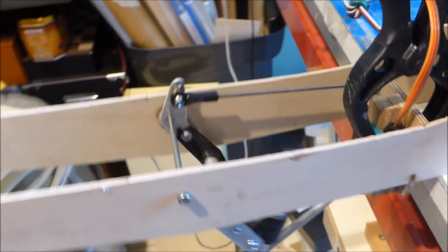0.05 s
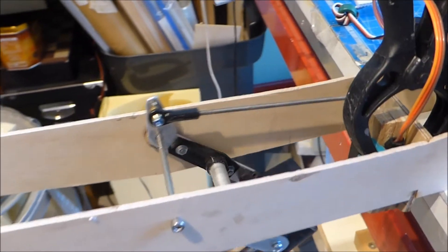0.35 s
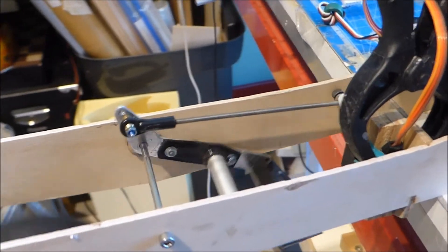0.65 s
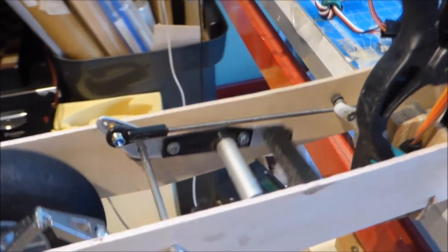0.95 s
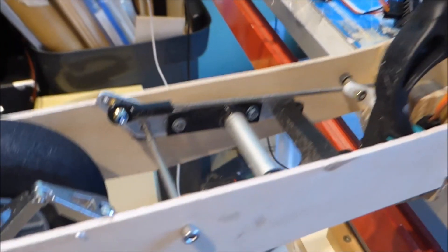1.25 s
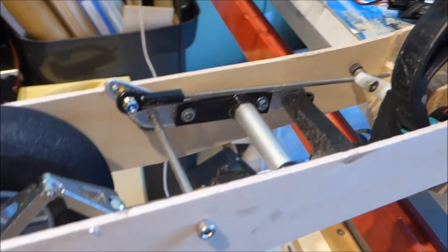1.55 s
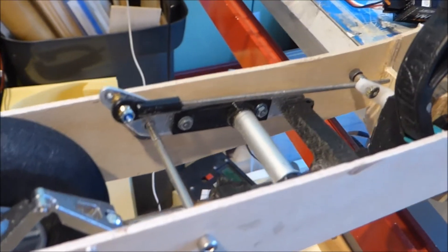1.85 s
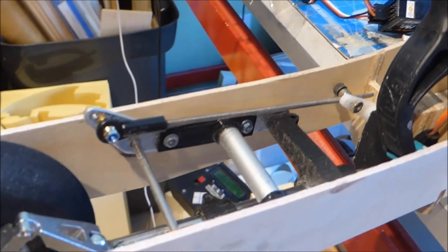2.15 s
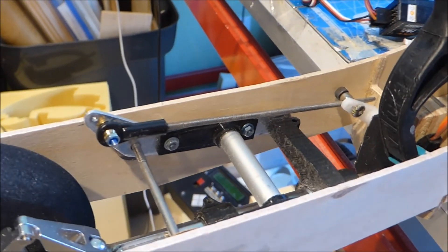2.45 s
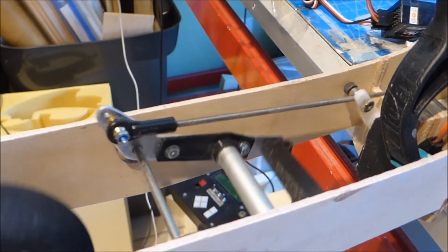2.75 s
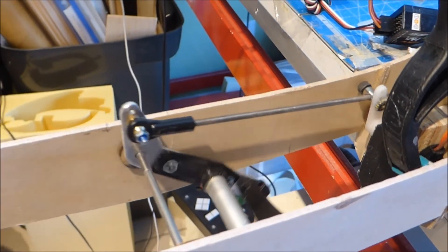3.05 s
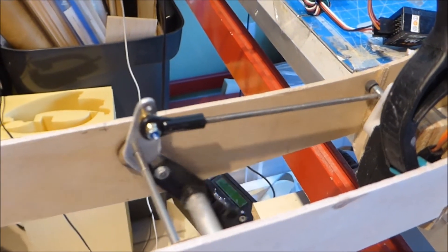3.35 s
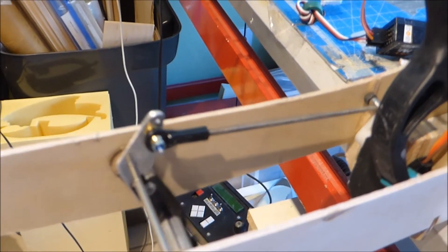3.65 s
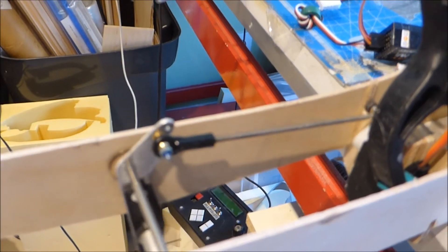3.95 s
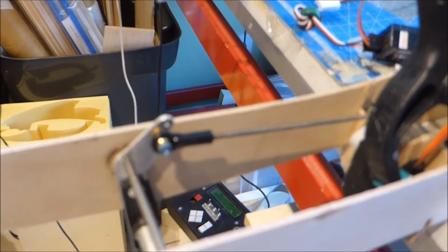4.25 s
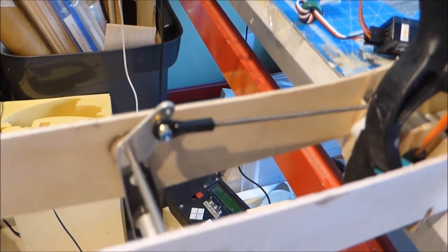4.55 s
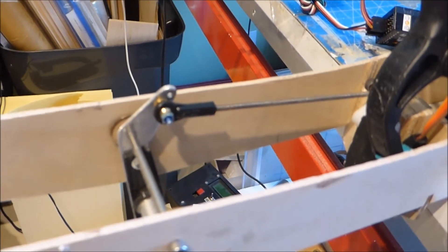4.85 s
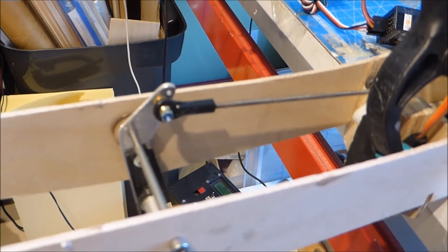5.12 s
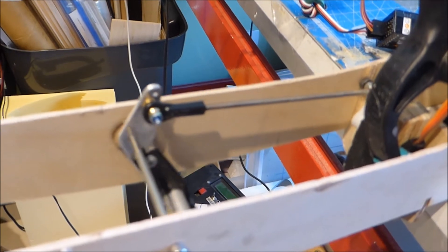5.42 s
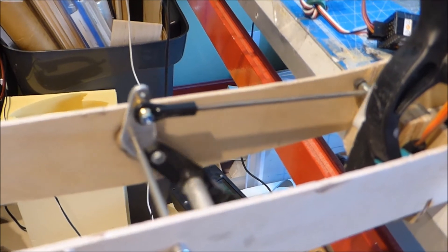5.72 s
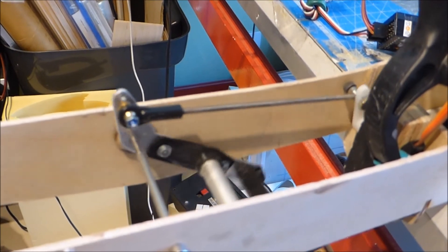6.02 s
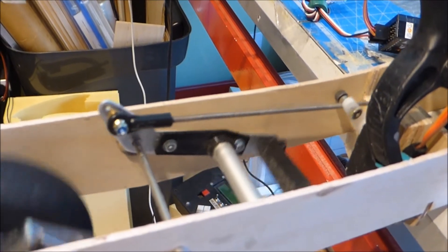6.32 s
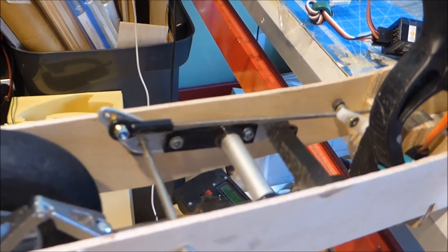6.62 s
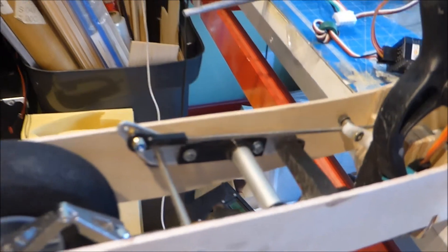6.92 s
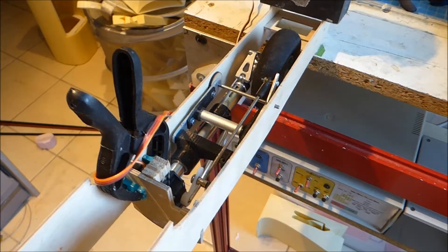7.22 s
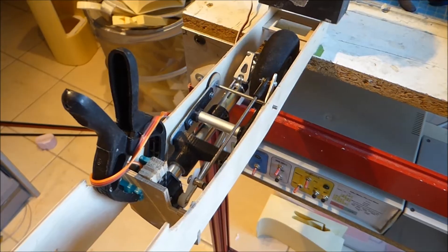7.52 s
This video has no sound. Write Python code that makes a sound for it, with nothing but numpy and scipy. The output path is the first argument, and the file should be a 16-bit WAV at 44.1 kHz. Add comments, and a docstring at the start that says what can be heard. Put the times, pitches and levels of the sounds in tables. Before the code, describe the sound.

In a quiet workshop, a small electric motor and its gears buzz and rattle close by, a little to the right, cycling a model landing gear leg. The whir stops and restarts three times, each restart beginning with a knock, the middle one the sharpest. The rattle pulses, growing louder and brighter under strain, with small clicks from the gear teeth. The pauses hold faint room noise, a few soft bumps and light rustling.

```python
"""A rattling, buzzing whir: a small geared servo swings a model landing gear leg in a plywood fuselage.
Each later run, down or up, opens with a knock as the slack is taken up. Tooth impacts and drive pulses
excite the resonances of case and frame; the rattle grows louder and brighter with load and surges with
each turn of an eccentric wheel. Around the runs are quiet workshop noise, soft bumps and light rustles."""
import sys
import numpy as np
from scipy import signal
from scipy.fft import rfft, irfft
from scipy.io import wavfile
from scipy.ndimage import uniform_filter1d, map_coordinates

SR = 44100
rng = np.random.default_rng(int(sys.argv[2]) if len(sys.argv) > 2 else 0)


def bounce(signal):
    """Save signal as a 16-bit WAV file at the path given by the first command-line argument."""
    frames = np.transpose(np.atleast_2d(signal))
    limited = np.clip(frames, -1, 1)
    pcm = np.round(limited * 32767).astype(np.int16)
    wavfile.write(sys.argv[1], SR, pcm)


N = 338688
TIME = np.arange(N) / SR
DRIVE_HZ, USUAL_LOAD_DB = 250.6, -34  # motor pulse rate; reference for the tooth load

AIR_SPECTRUM = [(15, -77), (25, -39), (113, -9.5), (178, -8.5), (289, -3), (358, -5), (388, -8),
                (481, -4.5), (664, -6.5), (1230, -11), (2290, -16), (4730, -21.5), (7460, -27),
                (13800, -28), (15400, -53)]  # room noise (f/Hz, relative density/dB)
AIR_COHERENCE = [(60, 0.89), (180, 0.81), (550, 0.32), (1650, -0.27), (4960, 0.2), (15000, 0.4)]  # likeness of the two channels (f/Hz, correlation)
ROOM_TONES = [(301.5, -70), (393.0, -70.5), (619.1, -76), (2003, -79), (4840, -80)]  # faint hum and idle whine (f/Hz, level/dB)
ROOM_DECAY = [(300, 0.24), (2000, 0.25), (10000, 0.17)]  # reverberation time (f/Hz, T60/s)
BALANCE = [(200, -8.5), (400, -12), (700, -10), (1290, -3), (2380, 1), (4390, -2), (8100, -1.5),
           (15000, 1.5)]  # direction of the sources (f/Hz, left minus right/dB)
RUSTLE_STROKES = [(4.28, 0.023, .01, 0.046, -58), (6.762, 0.15, .1, .05, -49),
                  (7.091, 0.011, 0.014, .05, -50), (7.322, .005, .012, .03, -63.5)]  # sliding movements (t/s, rise/s, hold/s, fall/s, level/dB)
RUSTLE_SPECTRUM = [(410, -53), (700, -10), (1100, -1.5), (1900, -4.5), (3140, -3), (8000, -8), (10200, -2),
                   (12200, -5.5), (15000, -24.5)]  # friction noise (f/Hz, relative density/dB)
FUSELAGE_BUMPS = [(.651, -35), (1.137, -37), (2.1454, -42), (2.2648, -41.5), (7.327, -42)]  # soft blows (t/s, peak level/dB)
SLACK_KNOCKS = [(2.5195, -36, -31.5), (2.529, -40.5, -35), (2.569, -36, -53), (5.0495, -41, -39.5),
                (5.0535, -19.5, -35.5), (5.0632, -25.5, -47), (5.0778, -24.5, -56), (7.5012, -33.5, -38),
                (7.514, -36, -40.5)]  # blows in the linkage (t/s, ring peak/dB, crack level/dB)
CRACK_SPECTRUM = [(530, -53), (900, -30), (1100, -2), (1340, -18), (2100, -18), (4960, -18), (8630, -14),
                  (15000, -20.5)]  # noise of a knock (f/Hz, relative density/dB)
TOOTH_SNAPS = [(.424, -23, 3200), (1.136, -36, 4500), (2.569, -29, 3300), (2.96, -16, 10200),
               (2.9616, -25, 4500), (2.966, -21.5, 4050), (3.251, -23, 9300), (3.291, -23, 3600),
               (3.302, -24, 2600), (3.319, -23, 6000), (3.3157, -20, 4600), (3.644, -27, 9200),
               (3.7394, -21, 4120), (5.1008, -26.5, 4200), (5.143, -25, 4500), (7.547, -36, 4520)]  # teeth crossing their play (t/s, level/dB, f/Hz)
BUZZ_HARMONICS = [(2, -23), (3, -18), (4, -7), (5, -1.5), (7, -10), (10, -10.5), (13, -29), (16, -9),
                  (17, -12), (18, -12), (19, -12), (20, -11), (21, -16), (22, -25), (23, -24), (25, -9),
                  (27, -13), (29, -22)]  # lines of the pulsed drive (harmonic number, relative level/dB)
GEAR_SQUEALS = [(.13, .192, 1920, 50, -44.5), (0.246, 0.879, 3230, 290, -37), (.308, .9, 2859, 27, -46),
                (0.41, .465, 3200, 400, -35.5), (2.604, 2.97, 4140, 80, -44), (2.722, 3.024, 1295, 59, -40),
                (2.937, 3.201, 4290, 80, -43.5), (3.926, 4.09, 2846, 30, -44.5),
                (3.957, 4.102, 3674, 80, -42), (5.078, 5.601, 4170, 130, -41.5),
                (5.643, 6.55, 3310, 300, -35), (5.892, 5.958, 3180, 470, -29.5),
                (7.532, 7.699, 2750, 50, -44)]  # passing resonances (start/s, end/s, f/Hz, width/Hz, level/dB)
# modes of fuselage, linkage and gears bearing on either tooth flank (f/Hz, width/Hz, gain/dB)
FUSELAGE_MODES = [(250, 35, 0), (310, 100, -3), (500, 200, -16), (1100, 470, -18.5)]
LINKAGE_MODES = [(490, 60, -13), (616, 90, -12), (834, 38, 3), (958, 45, -0.5), (1108, 45, 0),
                 (1490, 250, -13.5), (1870, 60, -8), (2060, 98, -8)]
RAISING_MODES = [(1002.5, 19, -8), (1059, 17, -3.5), (1167, 35, -11.5), (1225, 9.1, -14), (1300, 28, -7),
                 (1545, 184, -11), (2127, 44, -4.5), (2255, 40, 0.5), (2534, 56, 2), (2775, 60, -3),
                 (2817, 37, 1.5), (2990, 47, 2), (3256, 41, -5), (3343, 71, -1), (4170, 170, -9),
                 (4480, 150, -11), (5830, 120, -9)]
LOWERING_MODES = [(1022, 26, -1), (1063, 15, 1.5), (1120, 37, -3), (1276, 61, 3.5), (1312, 53, 0.5),
                  (1710, 45, -8), (2150, 87, -1.5), (3010, 180, 1.5), (3430, 150, -2), (4080, 150, 0.5),
                  (4250, 140, -7), (5260, 21, -2), (5900, 340, -1.5)]
# broad spectrum of the tooth contacts on either flank (f/Hz, relative density/dB)
RAISING_SPECTRUM = [(1000, -14), (1900, -32), (2400, -1.5), (3350, -9), (3700, -12.5), (4450, -5),
                    (5150, -14.5), (6000, -4), (6700, -15), (7300, -15), (8200, -9), (8950, -1.5),
                    (10000, -3.5), (11000, -7.5), (12800, -21), (15000, -52)]
LOWERING_SPECTRUM = [(1000, -8), (1900, -8), (2400, 1.5), (3700, -4.5), (4600, -4), (5400, -14), (6100, -8),
                     (7300, -8), (9500, -0.5), (11300, -5), (13000, -12), (15000, -40)]
PART_BANDS = [(930, 1950), (1950, 3600), (3600, 5100), (5100, 7200), (7200, 15000)]  # frame, case, gear train, pinion, tooth edges (low f/Hz, high f/Hz)
# motor runs (start/s, stop/s, lowering 0/1, pulse-driven share of the rattle,
# frame/dB, gear train/dB and pinion/dB at the usual load, buzz/dB)
MOTOR_RUNS = [(-.02, 1.123, 0, 0.22, -43, -39, -41.5, -50.5),
              (2.561, 4.083, 1, 0.53, -38.5, -39, -40.5, -47.5),
              (5.1, 6.609, 0, 0.033, -44, -42.5, -43, -50), (7.543, 7.7, 1, .24, -47, -43.5, -38.5, -58)]
LOAD_CURVES = [
    [(0, -37.5, -38.5), (0.22, -37.0, -33.5), (0.42, -36, -31), (0.55, -33.5, -33), (0.75, -33, -30.5),
     (0.9, -31, -32), (1.02, -33, -31), (1.11, -36, -36)],
    [(2.58, -41.5, -39), (2.66, -38, -33.5), (2.92, -37.5, -35), (2.98, -33.5, -33), (3.3, -33.5, -34.0),
     (3.62, -35, -36.5), (3.8, -41, -38.5), (3.9, -38.5, -35), (4.07, -40.5, -32.5)],
    [(5.11, -38, -40), (5.17, -34.0, -34), (5.42, -34, -36), (5.65, -32.5, -32), (5.83, -31.5, -32),
     (5.95, -29.0, -30), (6.1, -31.5, -30.5), (6.3, -29.0, -30.5), (6.6, -31.5, -32.5)],
    [(7.56, -41, -38), (7.675, -42, -35.5)],
]  # one curve a run (t/s, tooth load/dB, relative case level/dB)
TIGHT_SPOTS = [.62, 3.325, 6.113, 7.63]  # one moment of tightest mesh a run (t/s)


def amp(db):
    """Amplitude ratio of a level in decibels."""
    return np.exp(np.asarray(db) * (np.log(10) / 20))


def unit(x):
    """Normalisation to rms 1."""
    return x / np.sqrt(np.mean(x ** 2) + 1e-20)


def along(points, hz):
    """Interpolation of (f/Hz, value) points on a logarithmic axis."""
    f, values = np.transpose(points)
    return np.interp(np.log(hz + 1), np.log(f + 1), values)


def wobble(rate, t=TIME):
    """Smooth random modulation with rate knots a second."""
    fine = np.arange(int((t[-1] - t[0]) * rate + 2) * 10) / 10
    knots = rng.standard_normal(len(fine) // 10 + 1)
    return np.interp(t, t[0] + fine / rate, map_coordinates(knots, [fine]))


def filtered(x, gain, size=8192):
    """Minimum-phase filtering with the magnitude response gain(hz)."""
    cepstrum = irfft(np.log(np.maximum(gain(np.fft.rfftfreq(size, 1 / SR)), 1e-6)))
    cepstrum[..., 1:size // 2] *= 2
    cepstrum[..., size // 2 + 1:] = 0
    response = irfft(np.exp(rfft(cepstrum)))[..., :size // 2]
    return signal.oaconvolve(x, response, axes=-1)[..., :x.shape[-1]]


def resonance(hz, centre, width):
    """Magnitude response of a damped oscillator."""
    return hz * width / np.hypot(centre ** 2 - hz ** 2, hz * width)


def modal(hz, modes):
    """Magnitude response of a body whose modes add in power."""
    return np.sqrt(sum((amp(db) * resonance(hz, centre, width)) ** 2 for centre, width, db in modes))


def band(hz, lo, hi, order):
    """Magnitude response of a band-pass."""
    return ((1 + (lo / (hz + 1)) ** order) * (1 + (hz / hi) ** order)) ** -.5


def add(track, s, sound):
    """Superposition of a sound on a track at time s."""
    part = track[round(s * SR):][:len(sound)]
    part += sound[:len(part)]


def burst(t60, gain):
    """Exponential decay of coloured noise from an rms near 1."""
    t = TIME[:SR // 8]
    fade = amp(-60 * t / t60) * (1 - np.exp(-t / 0.00032))
    noise = filtered(rng.standard_normal(len(t)), gain, size=2048)
    return unit(noise * fade) * np.sqrt(np.mean(fade ** 2))


def ring(force, modes, lo, hi, order):
    """Forced response of a body's modes within a band, with peak 1."""
    response = filtered(force, lambda hz: modal(hz, modes) * band(hz, lo, hi, order))
    return response / np.abs(response).max()


def room_air(noise_db=-54):
    """Partly coherent noise at the two ears, with faint phase-modulated tones."""
    def mid_side_gain(hz):
        angle = np.arccos(np.clip(along(AIR_COHERENCE, hz), -.99, .99)) / 2
        return amp(along(AIR_SPECTRUM, hz)) * np.array([np.cos(angle), np.sin(angle)])

    mid, side = filtered(rng.standard_normal((2, N)), mid_side_gain)
    hum = sum(amp(db) * np.sin(2 * np.pi * hz * TIME + 1.26 * wobble(15)) for hz, db in ROOM_TONES)
    return amp(noise_db) * unit(np.array([mid + side, mid - side])) + np.sqrt(2) * hum


def reverberation(x, delay_samples=90):
    """Reflections from bench and walls decay exponentially, in a separate tail for each ear."""
    hz, t, noise = signal.stft(rng.standard_normal((2, SR // 3)), SR, nperseg=256)
    tail = signal.istft(noise * amp(-60 * t / along(ROOM_DECAY, hz)[:, None]), SR, nperseg=256)[1]
    tail /= np.linalg.norm(tail, axis=1, keepdims=True)
    return signal.fftconvolve(np.pad(x, (delay_samples, 0))[None], tail, axes=1)[:, :N]


def contacts(n, rate, scatter_db):
    """Shot noise: n samples of tiny random impacts, on average rate a second."""
    impulses = (rng.random(n) < rate / SR) * rng.choice([-1, 1], n)
    return unit(impulses * amp(scatter_db * rng.standard_normal(n)))


def rustles():
    """Sliding friction: something light sheds fine grains of sound in soft strokes."""
    strokes = sum(amp(db) * np.interp(TIME, s + np.cumsum([0, rise, hold, fall]), [0, 1, 1, 0])
                  for s, rise, hold, fall, db in RUSTLE_STROKES)
    grains = contacts(N, rate=15000, scatter_db=4)
    return strokes * unit(filtered(grains, lambda hz: amp(along(RUSTLE_SPECTRUM, hz))))


def fuselage_bumps():
    """Impulse response: each bump rings the low modes of the plywood."""
    out = np.zeros(N)
    thud = ring(signal.unit_impulse(SR // 8), FUSELAGE_MODES, lo=150, hi=4000, order=6)
    for s, db in FUSELAGE_BUMPS:
        add(out, s, amp(db) * thud)
    return out


def linkage_knocks(crack_t60=0.13, chatter_db=-27, chatter_t60=.08):
    """Impact excitation: as slack is taken up, the linkage cracks, chatters and rings."""
    out, t = np.zeros(N), TIME[:SR // 8]
    for s, ring_db, crack_db in SLACK_KNOCKS:
        chatter = amp(chatter_db - 60 * t / chatter_t60) * rng.standard_normal(len(t))
        force = signal.unit_impulse(len(t)) + chatter
        add(out, s, amp(ring_db) * ring(force, LINKAGE_MODES, lo=410, hi=2900, order=10))
        add(out, s, amp(crack_db) * burst(crack_t60, lambda hz: amp(along(CRACK_SPECTRUM, hz))))
    return out


def tooth_snaps(t60=0.016):
    """Backlash: loaded teeth snap across their play in heavily damped transients."""
    out = np.zeros(N)
    for s, db, centre_hz in TOOTH_SNAPS:
        add(out, s, amp(db) * burst(t60, lambda hz: resonance(hz, centre_hz, 0.35 * centre_hz) ** 2))
    return out


def run_times(start):
    """Time axis long enough for one run and its decay."""
    return TIME[max(round(start * SR), 0):][:SR * 7 // 4]


def running(t, start, stop, spin_up_s=0.0058, coast_t60=0.058):
    """Motor envelope: a linear rise at spin-up, an exponential decay under braking."""
    return np.clip((t - start) / spin_up_s, 0, 1) * amp(-60 * np.maximum(t - stop, 0) / coast_t60)


def drive_buzz(waver_db=3.0, jitter_rad=.45):
    """Periodic forcing: current pulses make the motor sing a wavering harmonic series."""
    out = np.zeros(N)
    for start, stop, *_, level_db in MOTOR_RUNS:
        t, harmonics = run_times(start), 0
        for k, db in BUZZ_HARMONICS:
            gain = amp(db + waver_db * wobble(18, t))
            phase = 2 * np.pi * (round(k) * DRIVE_HZ * t + rng.random())
            harmonics += gain * np.sin(phase + jitter_rad * wobble(39.98, t))
        add(out, t[0], np.sqrt(2) * amp(level_db) * running(t, start, stop) * harmonics)
    return out


def gear_squeals():
    """Narrow-band resonance: single gear modes stand out for stretches of the travel."""
    out = np.zeros(N)
    for start, end, centre_hz, width, db in GEAR_SQUEALS:
        n = np.clip(int((end - start) * SR), 2, SR)
        tone = filtered(rng.standard_normal(SR), lambda hz: resonance(hz, centre_hz, width) ** 2)
        add(out, start, amp(db) * unit(tone[-n:]) * signal.windows.tukey(n, .5))
    return out


def eccentric_surge(slow_hz=11.18, fast_hz=55.5, raising_db=3.4, lowering_db=2, fast_db=-0.14):
    """Amplitude modulation: an eccentric wheel tightens and slackens the mesh once a turn, with a faint ripple
    about five times a turn."""
    swing_db = 0.54 * wobble(45)  # random flutter
    for (start, _, lowering, *_), curve, tight_s in zip(MOTOR_RUNS, LOAD_CURVES, TIGHT_SPOTS):
        s, load_db, _ = np.transpose(curve)
        strain_db = np.interp(TIME, s, load_db) - USUAL_LOAD_DB
        depth_db = (lowering_db if round(lowering) else raising_db) * amp(.7 * strain_db)
        slow = np.abs(np.cos(np.pi * slow_hz * (TIME - tight_s))) - 2 / np.pi
        fast = np.cos(2 * np.pi * fast_hz * (TIME - tight_s))
        swing_db += (depth_db * slow + fast_db * fast) * running(TIME, start, s[-1])
    return amp(swing_db)


def shifting_contact(x, depth_db=2.0):
    """Modal excitation depends on the contact point; as it moves, neighbouring resonances take turns."""
    spectra = signal.stft(x, nperseg=512)[2]
    field = uniform_filter1d(rng.standard_normal(spectra.shape), size=2, axis=0)
    field = uniform_filter1d(field, size=12, axis=1)
    return signal.istft(spectra * amp(depth_db * unit(field)), nperseg=512)[1][:len(x)]


def tooth_rattle(t, pulsed_share, kick_s=0.0016, uneven_db=2):
    """Modulated shot noise: teeth chatter, and each drive pulse throws them across their backlash."""
    since_pulse = (t * DRIVE_HZ + .06 * wobble(250, t)) % 1 / DRIVE_HZ
    kicks = unit(np.exp(-since_pulse / kick_s) * amp(uneven_db * wobble(200, t)))
    power = 1 - pulsed_share + pulsed_share * kicks ** 2
    return contacts(len(t), rate=9500, scatter_db=2.5) * np.sqrt(power)


def gearbox(rasp_db=-2, drift_db=.5):
    """Source and filter: the rattle rings frame, case and gears, louder and brighter under load."""
    out = np.zeros(N)
    for run, curve in zip(MOTOR_RUNS, LOAD_CURVES):
        start, stop, lowering, pulsed_share, frame_db, train_db, pinion_db, _ = run
        t = run_times(start)
        modes = LOWERING_MODES if round(lowering) else RAISING_MODES
        rasp = LOWERING_SPECTRUM if round(lowering) else RAISING_SPECTRUM
        force = shifting_contact(tooth_rattle(t, pulsed_share))
        rattle = filtered(force, lambda hz: np.hypot(modal(hz, modes), amp(rasp_db + along(rasp, hz))))
        spectrum, hz = rfft(rattle), np.fft.rfftfreq(len(t), 1 / SR)
        parts = [unit(irfft(spectrum * band(hz, lo, hi, order=28), len(t))) for lo, hi in PART_BANDS]
        s, *columns = np.transpose(curve)
        load_db, case_db = (np.interp(t, s, column) for column in columns)
        strain_db = load_db - USUAL_LOAD_DB
        edges_db = load_db - 7
        levels_db = [frame_db + 0.92 * strain_db, case_db - 6.5, train_db + 0.98 * strain_db,
                     pinion_db + strain_db, edges_db]
        whir = sum(part * amp(db + drift_db * wobble(19.64, t)) for part, db in zip(parts, levels_db))
        add(out, t[0], whir * running(t, start, stop))
    return out


def scene(reverb_db=-6.5):
    """Direct sound, reflections and room noise add; interaural level sets the servo a little right."""
    gears = eccentric_surge() * (gearbox() + gear_squeals())
    direct = gears + linkage_knocks() + tooth_snaps() + fuselage_bumps() + rustles()
    sound = direct + drive_buzz() + amp(reverb_db) * reverberation(direct)
    placed = filtered(sound, lambda hz: amp(along(BALANCE, hz) * np.array([[.5], [-.5]])))
    return placed + room_air()


def record(dry, top_hz=15400):
    """Attenuation and band limiting: the level dips briefly, and nothing passes above top_hz."""
    dip_db = np.interp(TIME, [7.199, 7.202, 7.245, 7.248], [0, -30, -30, 0])
    passband = np.fft.rfftfreq(N, 1 / SR) < top_hz
    return irfft(rfft(dry * amp(dip_db)) * passband, N)


dry = scene()
out = record(dry)
bounce(out)
```